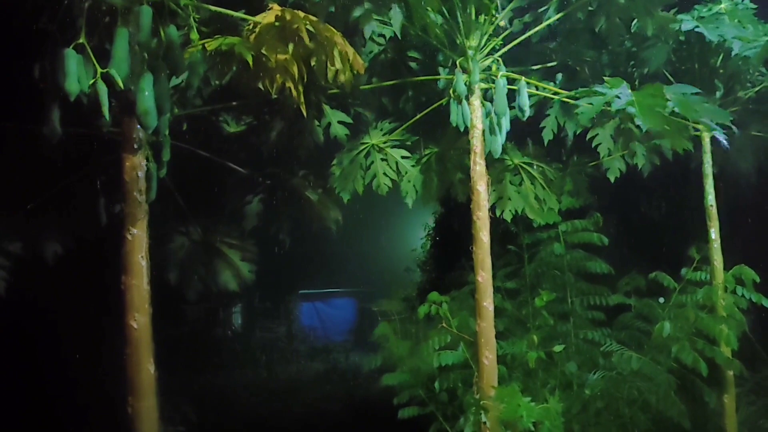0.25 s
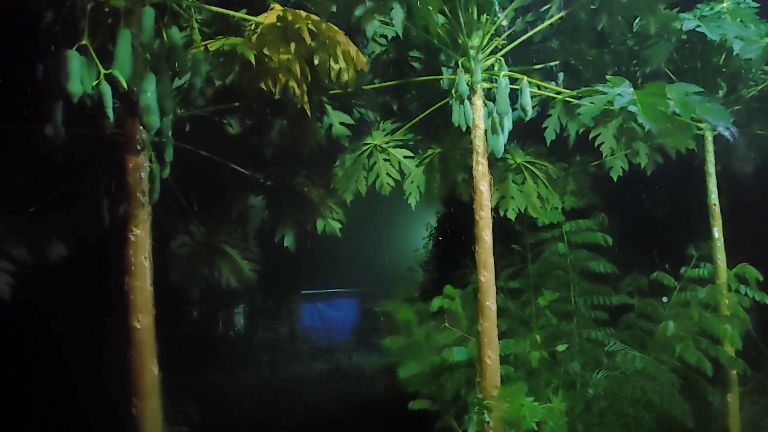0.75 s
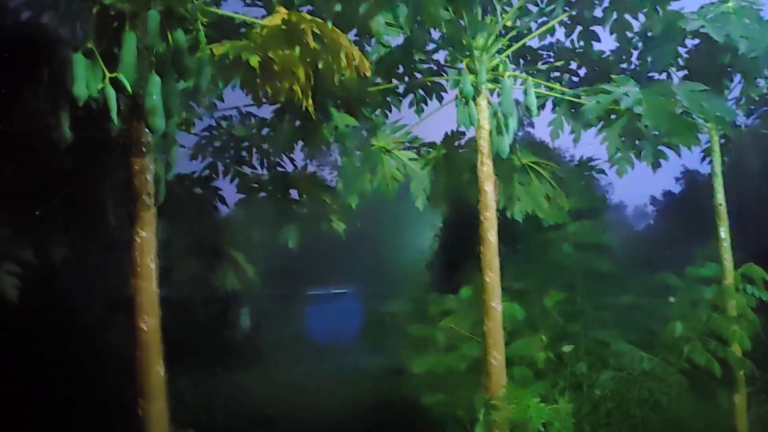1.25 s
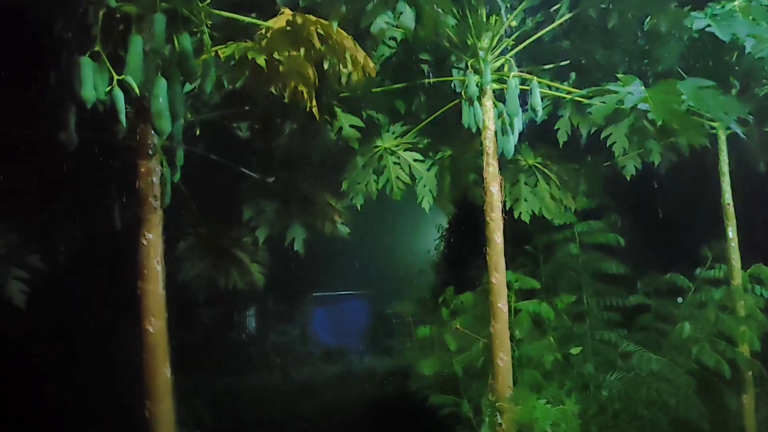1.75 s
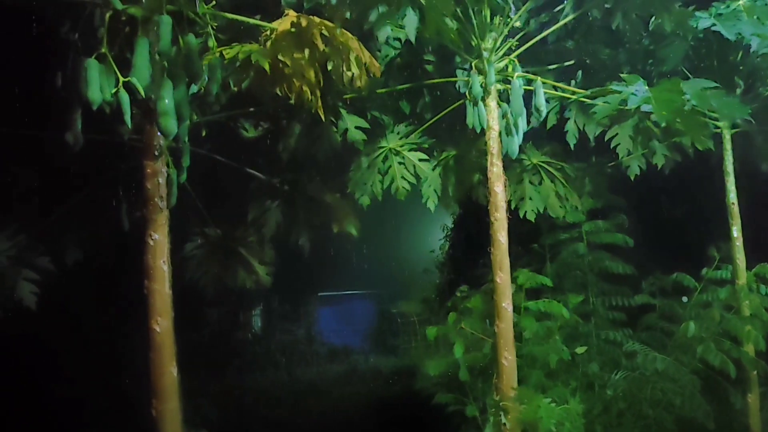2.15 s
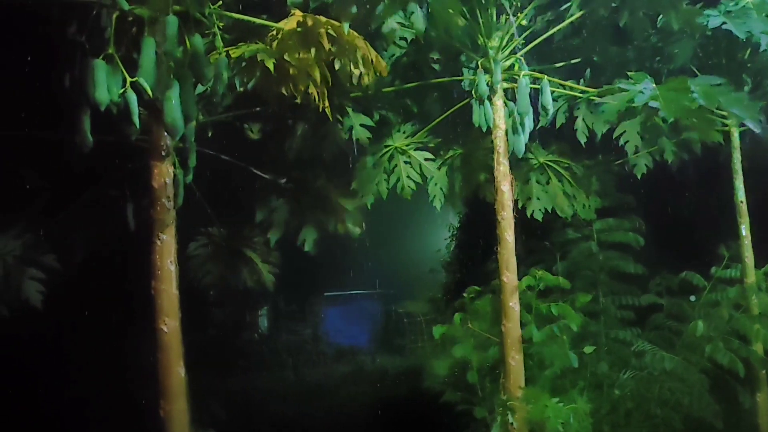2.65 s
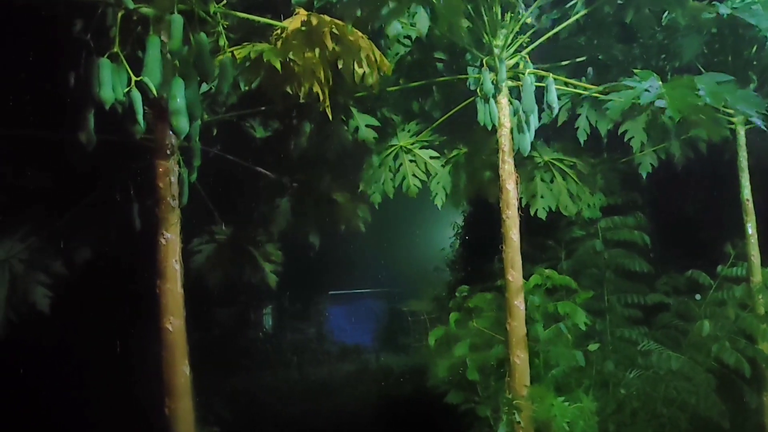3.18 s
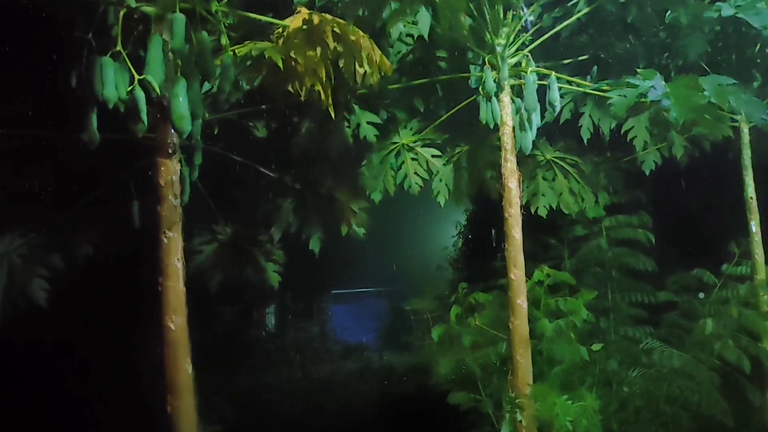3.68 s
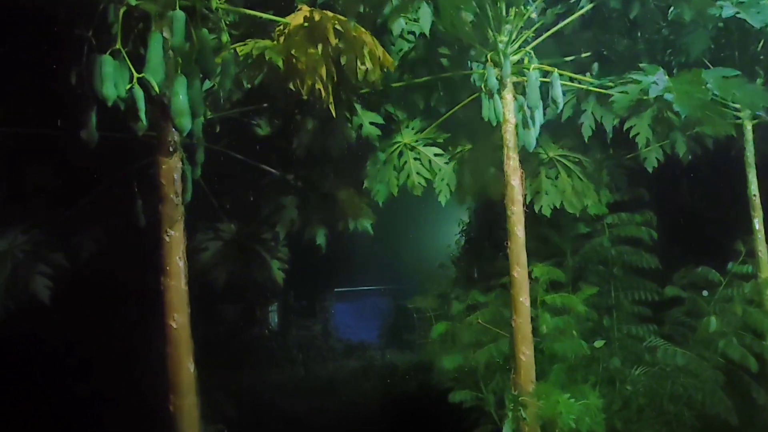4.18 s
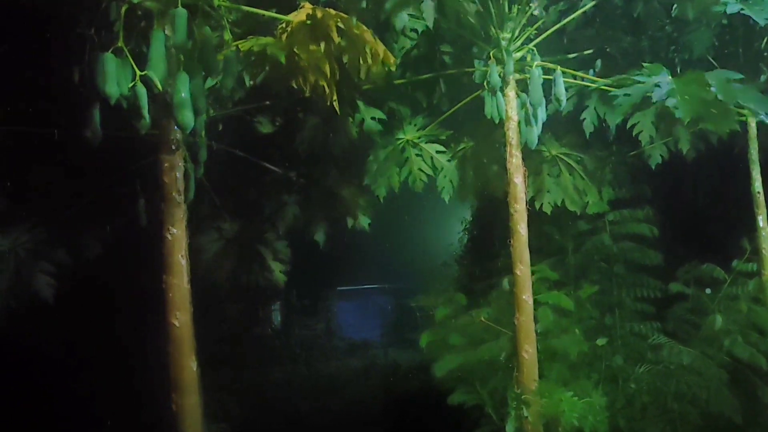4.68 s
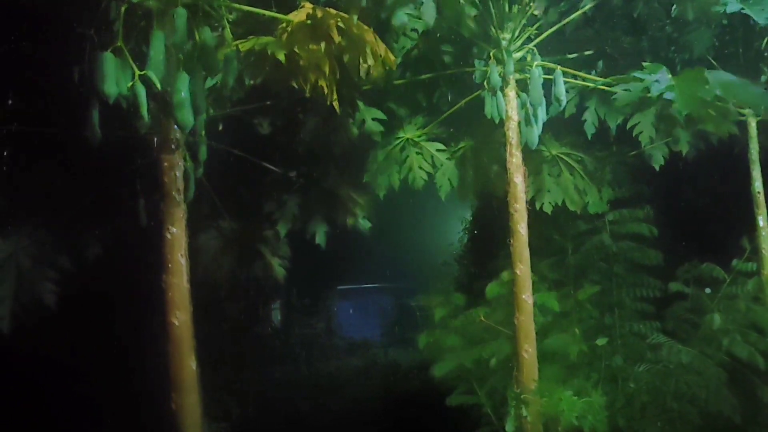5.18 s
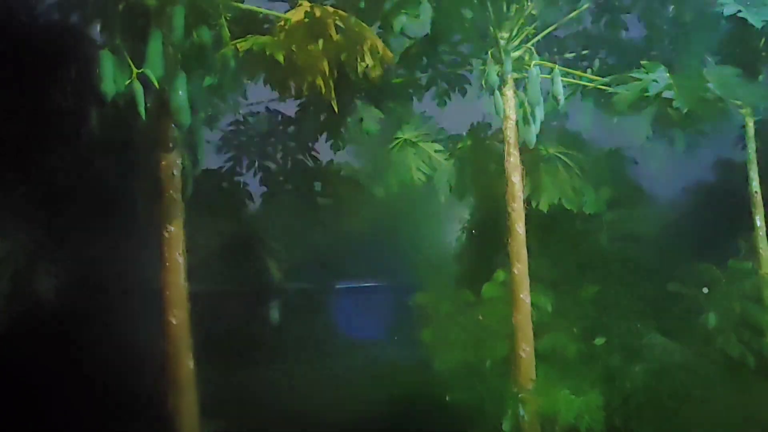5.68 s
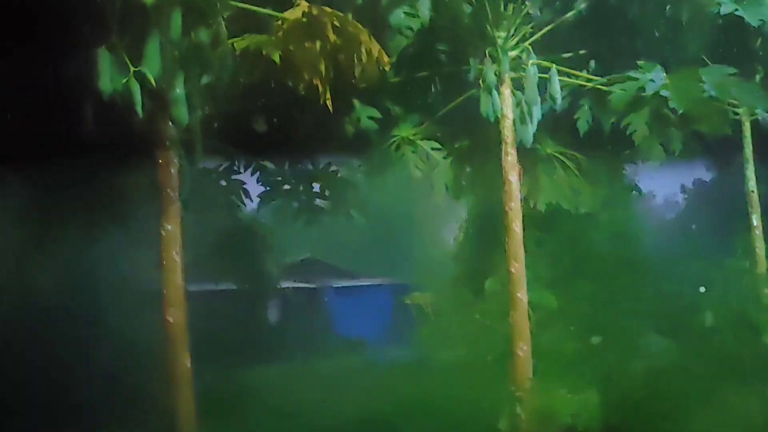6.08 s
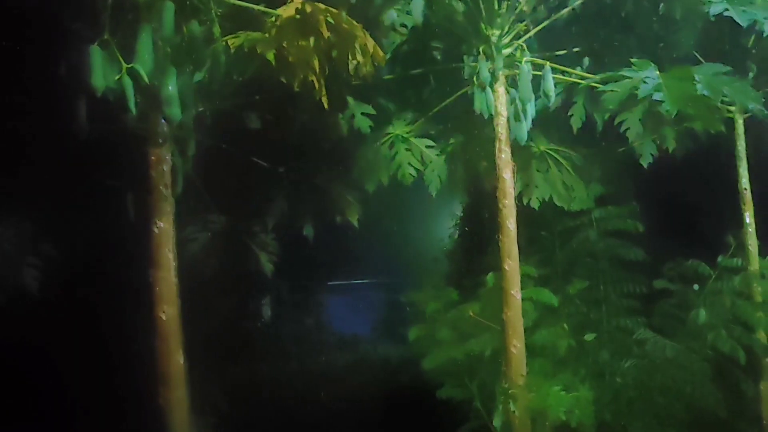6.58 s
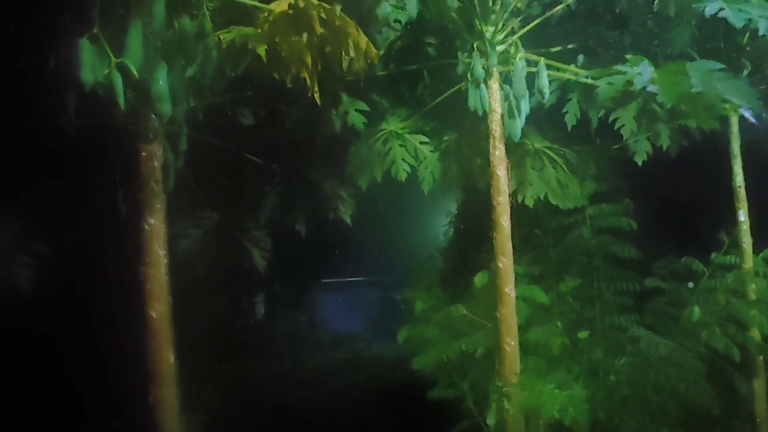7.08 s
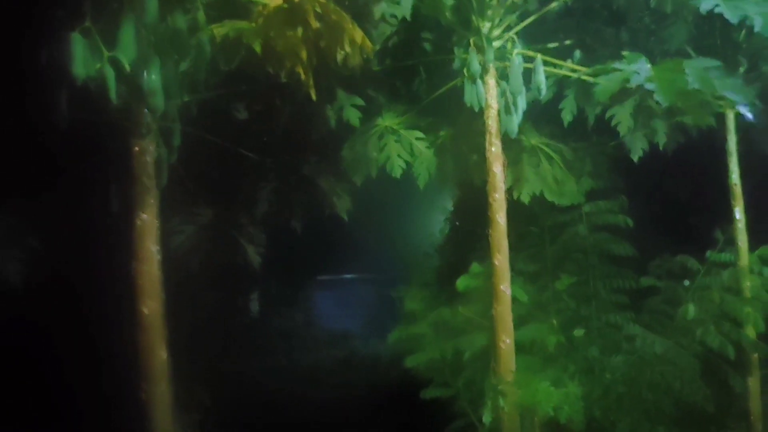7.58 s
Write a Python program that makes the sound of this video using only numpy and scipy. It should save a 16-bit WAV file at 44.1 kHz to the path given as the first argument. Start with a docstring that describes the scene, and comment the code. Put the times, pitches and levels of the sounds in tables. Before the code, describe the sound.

Dense unbroken downpour on garden foliage, crisp leaf patter and scattered fat drips nearby, over a faint deep rumble and soft wind thumps.

```python
"""A yard at night: heavy rain falls steadily on trees and broad leaves.
Far drops merge into a wash of shaped noise; nearer ones tick on leaves as damped pings; fat drips slap close by.
Two microphone ports colour the hiss, each with its own response.
A light wind, slow-modulated low noise, buffets mostly the left port over a faint deep rumble."""
import sys
import numpy as np
from scipy import signal
from scipy.fft import rfft, irfft, next_fast_len
from scipy.io import wavfile
from scipy.ndimage import uniform_filter1d, map_coordinates

SR = 44100
rng = np.random.default_rng(int(sys.argv[2]) if len(sys.argv) > 2 else 0)


def unload_audio(sound):
    """Save the sound as a 16-bit wav file, at the path given as the first command line argument."""
    columns = np.transpose(np.atleast_2d(sound))
    # keep every value between -1 and 1, then stretch to whole-number steps
    steps = np.round(np.clip(columns, -1, 1) * 32767)
    wavfile.write(sys.argv[1], SR, steps.astype(np.int16))


N = 345744

# deep rumble spectrum: (frequency [Hz], relative density [dB per Hz])
RUMBLE_SPECTRUM = [(12, -11), (22, -9), (33, -5), (52, 3), (75, -1.5), (100, -5), (150, -16), (500, -70)]
# rumble swells and lulls, before trim: (time [s], level [dB])
RUMBLE_SWELLS = [(0.0, -63), (0.21, -63), (0.26, -47), (0.35, -63), (0.4, -50), (0.51, -61), (0.62, -49),
                 (0.71, -58), (0.77, -49), (0.83, -55), (0.92, -57), (1.0, -66), (1.21, -62), (1.28, -44),
                 (1.38, -58), (1.42, -46), (1.54, -51), (1.76, -45), (1.88, -57), (2.07, -43), (2.11, -56),
                 (2.14, -50), (2.34, -38), (2.38, -54), (2.51, -48), (2.62, -54), (2.73, -47), (2.87, -50),
                 (2.93, -40), (3.1, -51), (3.3, -45), (3.34, -51), (3.54, -44), (3.57, -53), (3.68, -42),
                 (3.75, -57), (3.79, -45), (4.07, -47), (4.14, -62), (4.22, -48), (4.35, -50), (4.38, -54),
                 (4.42, -44), (4.61, -53), (4.89, -43), (5.04, -64), (5.09, -50), (5.58, -51), (5.64, -43),
                 (5.7, -60), (5.93, -46), (6.06, -56), (6.13, -41), (6.22, -53), (6.3, -44), (6.36, -59),
                 (6.49, -49), (6.54, -55), (6.61, -47), (6.77, -58), (6.81, -48), (6.92, -56), (7.0, -44),
                 (7.14, -51), (7.19, -63), (7.26, -47), (7.37, -41), (7.49, -60), (7.63, -47), (7.71, -51),
                 (7.74, -62), (7.83, -49)]
# wind noise spectrum at a port: (frequency [Hz], relative density [dB per Hz])
WIND_SPECTRUM = [(12, -9), (30, 1), (48, 3.5), (75, 3.5), (130, -5), (200, -4), (300, -17), (420, -21),
                 (1500, -80)]
# breeze strength at the left port, before trim and eddies: (time [s], level [dB])
BREEZE_LEVEL = [(1.2, -65), (1.26, -56), (1.36, -54), (1.43, -72), (1.49, -52), (1.9, -35), (2.13, -43),
                (2.3, -32), (2.4, -43), (2.63, -34), (2.74, -40), (2.88, -30), (3.08, -31.5), (3.27, -32),
                (3.42, -38), (3.64, -32), (3.91, -46), (4.41, -38), (4.52, -47), (4.99, -36), (5.08, -39),
                (5.46, -35), (5.64, -38), (5.7, -34), (6.12, -52), (6.26, -44), (6.32, -64), (6.38, -45),
                (6.56, -43), (6.65, -50), (7.27, -39), (7.55, -47), (7.64, -45), (7.73, -58), (7.77, -67),
                (7.83, -61)]
# far wash spectrum: (frequency [Hz], relative density [dB per Hz])
WASH_SPECTRUM = [(30, -42), (80, -28), (100, -8.5), (115, -0.5), (138, 3.5), (165, 2.5), (200, .5),
                 (235, 3.5), (390, 1.74), (500, 2.1), (640, 4.5), (950, 2), (1250, 0), (2500, 2.5),
                 (5000, 0), (9000, -0.5)]
# likeness of the wash at the two ports: (frequency [Hz], correlation [-1 to 1])
PORT_CORRELATION = [(140, 1), (330, 0.99), (600, 0.74), (850, 0.4), (1100, 0.11), (1800, -0.27),
                    (2500, 0.26), (3500, -0.091), (4250, 0.16), (4800, -0.059), (10000, 0.068)]
# depth scale of random level patches laid over the noise: (frequency [Hz], depth [dB])
PATCH_DEPTH = [(300, 0.7), (800, 1.03), (1400, 3.5), (2400, 1.5), (3000, 2.5), (3600, 0.94), (4300, 3.5),
               (5200, 0.16), (8000, 8), (13000, 4)]
# fat drips, before port colour: (time [s], relative level [dB], pitch [Hz], left minus right [dB])
FAT_DRIPS = [(0.106, 2, 5120, -12), (0.287, -2, 3520, 4), (0.32, -6, 3500, -12), (0.601, -6, 3490, 12),
             (0.686, -14, 3490, 10), (1.605, -2, 3570, 12), (1.628, -4, 3790, 8), (1.688, -3, 3880, 1),
             (1.971, -4, 4870, -12), (2.042, -4, 5100, -9), (2.159, -3, 3880, 12), (2.18, 4, 5470, 2),
             (2.621, -8, 3790, 10), (2.645, 0, 13520, 14), (2.729, 0, 13440, -14), (3.011, -1, 5050, -12),
             (3.486, 0, 9690, 1), (3.567, -2, 5030, 5), (3.966, 3, 5220, -11), (4.191, -3, 3270, 10),
             (4.422, -3, 5170, -12), (4.458, 1, 4900, -7), (4.919, 0, 4900, 1), (5.109, -4, 4520, -3),
             (5.13, 0, 2540, 3), (5.286, 1, 5800, -10), (5.386, 5, 4720, -3), (5.462, -6, 4560, -5),
             (5.53, 0, 3750, 6), (6.315, -6, 5940, 12), (6.448, 6, 3920, 10), (6.49, 4, 4850, -9),
             (7.111, -3, 4000, 12), (7.156, -1, 3750, 6), (7.283, 4, 6500, -6), (7.458, 1, 4920, -6),
             (7.709, -2, 4260, 12), (7.789, -1, 3640, 12)]
# port responses: (frequency [Hz], gain [dB])
LEFT_RESPONSE = [(1250, -1.15), (1750, 2), (2300, 3), (2520, 4), (2820, -1), (3150, -0.9), (3500, 4),
                 (3850, 2), (4280, -1.1), (4560, 1.8), (4730, -6), (5000, -3), (5300, -0.5), (5850, -2),
                 (6250, -4.5), (6750, -11), (6980, -8.5), (7450, -32), (7700, -20), (8100, -43),
                 (8400, -24.5), (9900, -21.5), (12000, -24), (14000, -19.5), (15600, -35.6)]
RIGHT_RESPONSE = [(1250, -1.12), (2150, 1.2), (2550, 0.7), (2900, 0.4), (3600, 5.5), (3950, 4), (4350, 0.5),
                  (4850, 7.5), (5250, 7.5), (6000, 2), (6700, -7), (6980, -5.5), (7450, -18), (7750, -14.5),
                  (8100, -31), (8500, -27.5), (10000, -19), (11300, -23), (12600, -18.5), (14700, -18),
                  (15600, -29)]

SOUND_SPEED_M_S, PORT_GAP_M = 343, 0.14
TOP_HZ = 15750
# layer gains ahead of the port colour
WASH_DB, PATTER_DB, SPATTER_DB, SPRAY_DB, DRIP_DB = -17.5, -34.5, -34.5, -28.5, -17
WIND_TRIM_DB, RUMBLE_TRIM_DB = 0.3, -0.5
EDDY_DB, LEEWARD_DB = 2.0, -20  # eddy depth scale; right port relative to left
FLUTTER_DB, FLUTTER_ABOVE_HZ = 0.5, 3500


def amp(db):
    """Decibels to gain."""
    return 10 ** (np.asarray(db) / 20)


def unit(x):
    """Scale a signal to rms 1."""
    return x / np.sqrt(np.mean(x ** 2) + 1e-20)


def along(points, hz):
    """Interpolate (frequency, value) points on a log axis."""
    f, v = np.transpose(points)
    return np.interp(np.log(hz + 1), np.log(f + 1), v)


def over_time(points):
    """Interpolate (time, value) points at every sample."""
    return np.interp(np.arange(N) / SR, *np.transpose(points))


def wobble(rate_hz):
    """Smooth random curve with rate_hz knots a second."""
    knots = rng.standard_normal(int(N * rate_hz / SR) + 4)
    return map_coordinates(knots, [np.arange(N) * rate_hz / SR])


def filtered(x, response):
    """Apply a zero-phase gain given as a function of frequency."""
    size = next_fast_len(N + SR // 2)
    gain = response(np.fft.rfftfreq(size, 1 / SR))
    return irfft(rfft(x, size) * gain, size)[..., :N]


def panned(pan_db):
    """Left and right gains for a level difference."""
    return amp(np.array([pan_db, -pan_db]) / 2)


def low_noise(spectrum):
    """Shaped noise held near rms 1 over each 0.1 s, so that a level curve sets its swells."""
    x = filtered(rng.standard_normal(N), lambda hz: amp(along(spectrum, hz)))
    power = np.abs(uniform_filter1d(x ** 2, size=SR // 10))
    return x / np.sqrt(power + 1e-20)


def rumble():
    """Faint deep noise flutters under the rain, alike at both ports."""
    return low_noise(RUMBLE_SPECTRUM) * amp(RUMBLE_TRIM_DB + over_time(RUMBLE_SWELLS))


def wind():
    """After a calm start the breeze buffets the left port; the right one lies in the lee."""
    ports = []
    for side_db in (0, LEEWARD_DB):
        eddies_db = EDDY_DB * wobble(17)
        ports.append(low_noise(WIND_SPECTRUM) * amp(side_db + eddies_db))
    return np.array(ports) * amp(WIND_TRIM_DB + over_time(BREEZE_LEVEL))


def far_wash():
    """Rain all around: mid and side noise make long waves alike at both ports, short ones mostly not."""
    def mid_side_gains(hz):
        # cos^2 - sin^2 of this angle is the correlation
        angle = np.arccos(np.clip(along(PORT_CORRELATION, hz), -1, 1)) / 2
        return amp(along(WASH_SPECTRUM, hz)) * [np.cos(angle), np.sin(angle)]

    mid, side = filtered(rng.standard_normal((2, N)), mid_side_gains)
    return np.array([mid + side, mid - side])


def impacts(count, centre_hz, spread_octaves, decay_cycles, strength_db, spread_db):
    """Drops at random times and bearings, each a damped ping of a wet leaf; rms 1."""
    when, size, bearing = rng.random((count, 3)).T
    pitch, life = rng.standard_normal((count, 2)).T
    hz = np.clip(centre_hz * 2 ** (spread_octaves * pitch), 200, TOP_HZ)
    age = np.arange(SR // 200)  # samples, 5 ms
    turns = hz[:, None] * age / SR
    decay = np.exp(-turns / (decay_cycles * np.exp(life / 2))[:, None])
    pings = np.sin(2 * np.pi * turns) * decay
    strength = amp(strength_db * np.log(size + 0.037))  # most near full strength, a few much weaker
    leftward = 2 * bearing - 1
    ports = []
    for gain, towards in zip(panned(spread_db * leftward), (leftward, -leftward)):
        lag_s = (1 - towards) / 2 * PORT_GAP_M / SOUND_SPEED_M_S  # later at the farther port
        at = (when * N + lag_s * SR).astype(int)[:, None] + age
        weighted = pings * (strength * gain)[:, None]
        ports.append(np.bincount(at.ravel(), weighted.ravel(), N)[:N])
    # a small leaf radiates little at long wavelengths
    return unit(filtered(np.array(ports), lambda f: f ** 2 / (f ** 2 + (centre_hz * 0.17) ** 2)))


def spray():
    """Tiny droplets thrown off by splashes fizz as short high pings of uneven level."""
    fizz = impacts(count=20000, centre_hz=12000, spread_octaves=0.2, decay_cycles=1.1,
                   strength_db=1.5, spread_db=11)
    return fizz * amp(2.1 * wobble(27))


def spatter():
    """Water shed by the crowns spatters on broad leaves as damped pings of uneven level."""
    splats = impacts(count=2600, centre_hz=4510, spread_octaves=0.5, decay_cycles=1.8,
                     strength_db=1.0, spread_db=10)
    return splats * amp(0.81 * wobble(24))


def leaf_patter():
    """Nearer drops tick on leaves as damped pings whose level flutters."""
    ticks = impacts(count=6000, centre_hz=4085, spread_octaves=0.435, decay_cycles=2.6,
                    strength_db=4.5, spread_db=18.0)
    return ticks * amp(0.51 * wobble(24))


def patchy(x, thinning=0.42):
    """Random level patches, some 150 Hz by 60 ms, swell and fade; they fade further than they swell."""
    hz, _, z = signal.stft(x, SR, nperseg=1024)
    field = rng.standard_normal(z.shape[1:])
    for frames in (5, 2):
        field = uniform_filter1d(field, size=3, axis=0)
        field = uniform_filter1d(field, size=frames, axis=1)
    field = unit(field)
    field = field - thinning * (field ** 2 - 1)
    gain = amp(along(PATCH_DEPTH, hz)[:, None] * field)
    return signal.istft(z * gain, nperseg=1024)[1][:, :N]


def treble_flutter(x):
    """The level above about FLUTTER_ABOVE_HZ flutters under one random curve."""
    treble = filtered(x, lambda hz: hz ** 4 / (hz ** 4 + FLUTTER_ABOVE_HZ ** 4))
    return x - treble + treble * amp(FLUTTER_DB * wobble(26))


def drips(ping_t60_s=0.011, splash_gain=0.16, splash_t60_s=0.027):
    """Fat drips slap a near leaf: a short decaying ping and a noise puff of splash."""
    out = np.zeros((2, N + SR))
    t = np.arange(SR // 20) / SR
    for start_s, level_db, hz, pan_db in FAT_DRIPS:
        ping = np.sin(2 * np.pi * hz * t) * amp(-60 * t / ping_t60_s)
        puff = splash_gain * rng.standard_normal(len(t)) * amp(-60 * t / splash_t60_s)
        sides = panned(pan_db)
        sides = sides / sides.max()  # louder side at full level
        start = round(start_s * SR)
        out[:, start:start + len(t)] += amp(level_db) * sides[:, None] * (ping + puff)
    return out[:, :N]


def scene():
    """Rain coloured by the two ports, plus the wind on them and the rumble."""
    low = rumble() + wind()
    far = amp(WASH_DB) * far_wash()
    near = amp(SPRAY_DB) * spray() + amp(SPATTER_DB) * spatter() + amp(PATTER_DB) * leaf_patter()
    rain = treble_flutter(patchy(far + near)) + amp(DRIP_DB) * drips()
    coloured = filtered(rain, lambda hz: amp([along(LEFT_RESPONSE, hz), along(RIGHT_RESPONSE, hz)]))
    return coloured + low


def record(dry):
    """Sharp band limit: nothing passes at or above TOP_HZ."""
    return filtered(dry, lambda hz: hz < TOP_HZ)


dry = scene()
out = record(dry)
unload_audio(out)
```